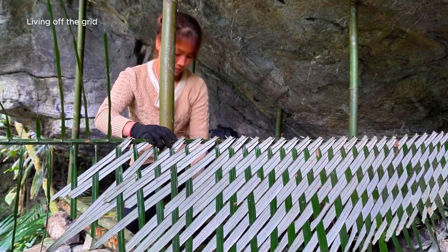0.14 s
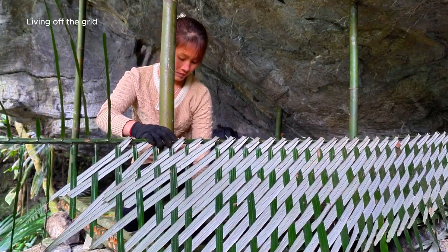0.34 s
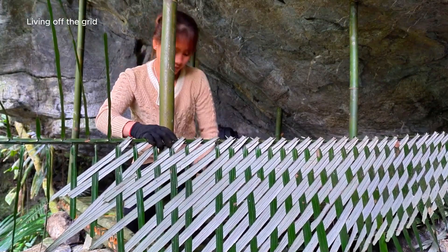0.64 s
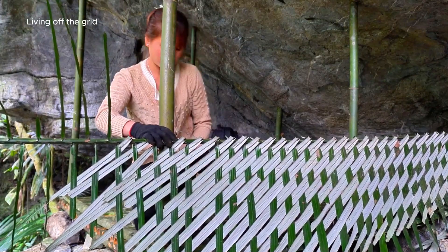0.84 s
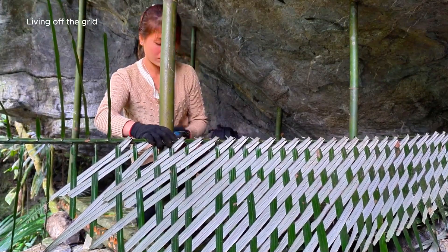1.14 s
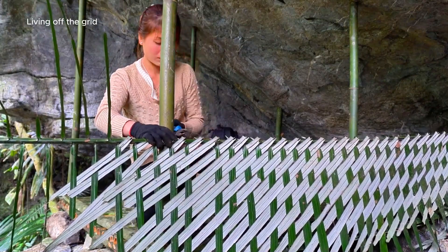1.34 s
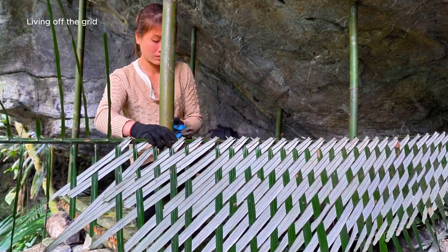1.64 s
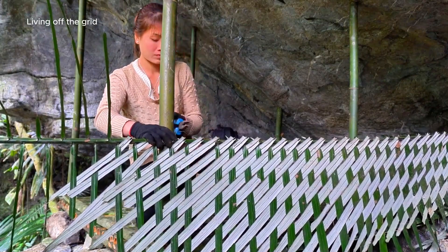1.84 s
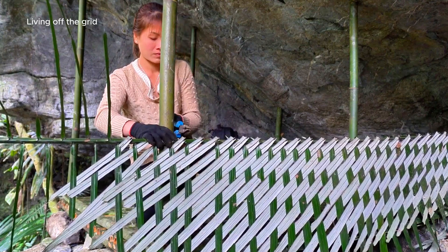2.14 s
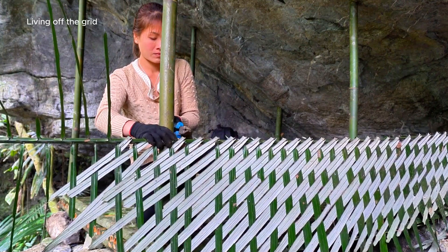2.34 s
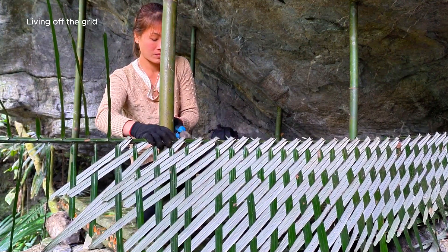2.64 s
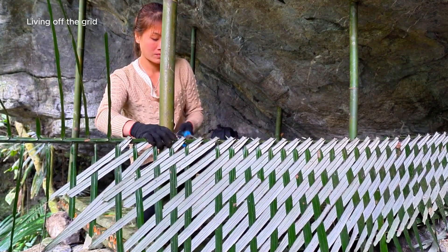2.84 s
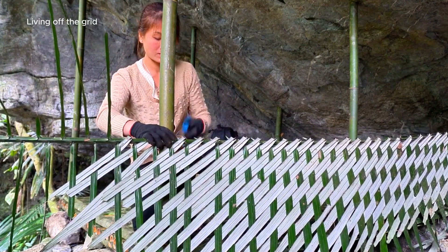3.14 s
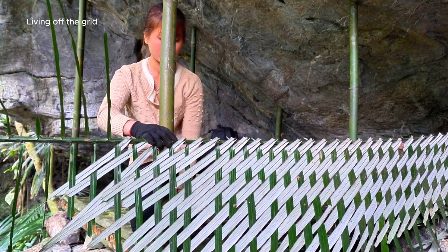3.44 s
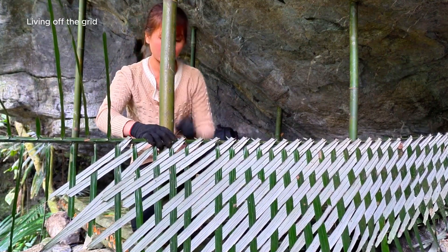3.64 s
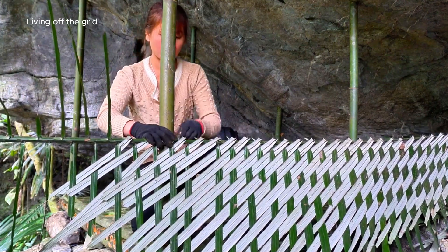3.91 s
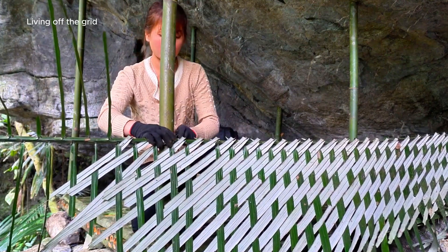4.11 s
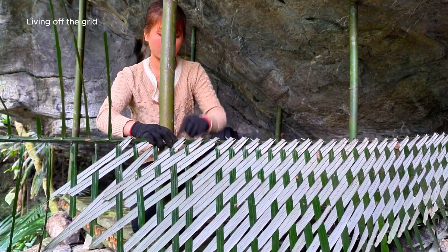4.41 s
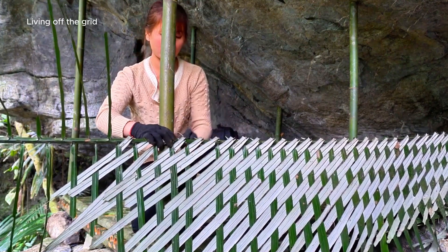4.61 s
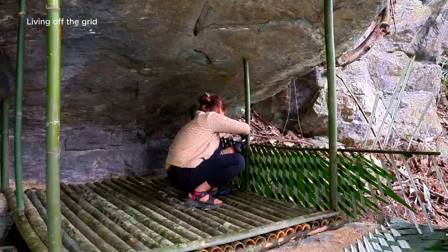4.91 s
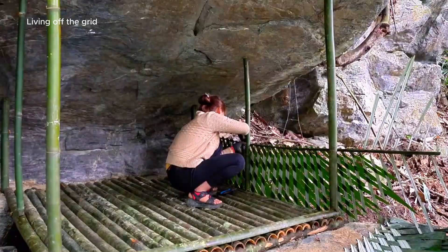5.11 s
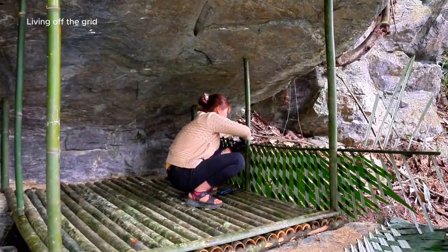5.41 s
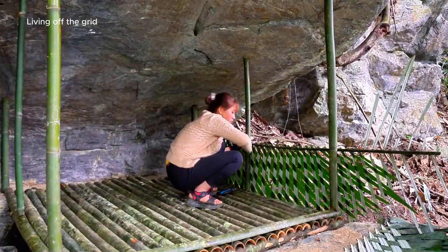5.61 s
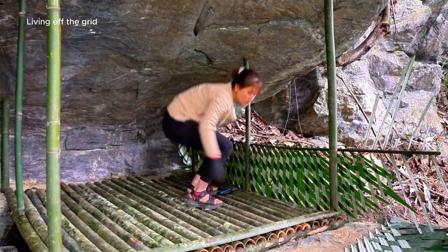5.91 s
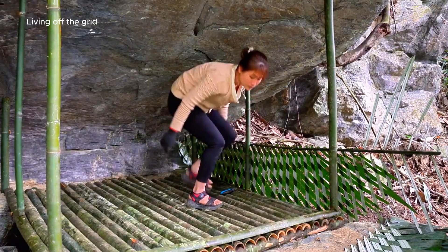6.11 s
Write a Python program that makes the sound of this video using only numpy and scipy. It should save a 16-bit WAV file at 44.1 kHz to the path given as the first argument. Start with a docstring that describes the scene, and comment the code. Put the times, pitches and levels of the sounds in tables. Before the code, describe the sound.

Hands weave split bamboo strips into a bamboo lattice under a rock overhang. A sharp snap and rattle come within the first half second, then mostly quiet. Around two seconds a small scrape, then a hard bright click, and from three and a half a busy run of woody slides and taps. It thins out, ending with one firm scrape and knock. Close stereo microphone, faint hiss and short sparse echoes.

```python
"""Bamboo weaving under a rock overhang

Hands weave thin bamboo strips through a bamboo frame. Ticks, a short ring and a bright snap, are strip edges
letting go. Slaps and slides are bursts of tiny slips that ring the mat, the moving strip and the frame, with
fibre hiss on top. The rock answers with a short tail of sparse echoes; behind it all lies quiet forest air
with microphone hiss, drawn as random spectra."""
import sys
import numpy as np
from scipy import signal
from scipy.io import wavfile
from scipy.ndimage import uniform_filter1d

SR = 44100
rng = np.random.default_rng(int(sys.argv[2]) if len(sys.argv) > 2 else 0)


def store_wav(level_fs):
    """Save 16-bit WAV to argv[1]."""
    pcm = np.round(np.clip(np.atleast_2d(level_fs), -1, 1) * 32767)
    wavfile.write(sys.argv[1], SR, pcm.T.astype(np.int16))


N = 276066  # samples

# spectrum of fibres rubbing and snapping: hz [Hz], level_db [relative dB per Hz]
FIBRE_HISS = [(2900, -33.5), (5000, 1), (6200, -0.5), (7200, -3.5), (8500, -2), (10200, 0.5), (12000, -2.5),
              (15500, -5), (16500, -2.5)]
LEAN_DB = -0.15  # left over right, for slaps and slides


def snapping_ticks():
    """Strip edges bend past each other and let go, each one a sharp release."""
    # releases: start_s [s], peak_db [dB], ring_hz [Hz], treble_db [dB against the ring], pan_db [dB left over right]
    releases = [(0.0274, -17.5, 5200, -19, 1), (0.0613, -20, 2620, -7, -1), (0.1693, -41.5, 2440, 7, -2),
                (0.386, -36.5, 1900, 10.5, 12), (0.4586, -11, 4060, 3.5, -3), (1.817, -29.5, 6040, 9, 0),
                (2.572, -30, 7480, 32, -2.0), (2.6574, -7.5, 1790, 19, -2), (2.661, -8.5, 5100, 3.5, 2.0),
                (3.1797, -20.5, 3800, 8.5, 0), (3.1986, -25.5, 5130, 3.5, 1.0), (3.572, -51, 1480, -20, -2),
                (3.7974, -40.0, 6940, -4.5, 3.0), (3.8636, -35, 1630, 4.5, -1.0), (4.086, -23, 3540, 5, 0),
                (4.2125, -34, 4520, -6, 3), (4.794, -37, 5780, 10, -1.0), (4.9116, -30.5, 4500, -11, 2),
                (5.279, -45, 5070, 4, 0), (6.1402, -18, 1820, 4, -8), (6.145, -24, 1550, -8, 0)]
    ticks = np.zeros((2, N))
    for start_s, peak_db, ring_hz, treble_db, pan_db in releases:
        add(ticks, start_s, tick(peak_db, ring_hz, treble_db), pan_db)
    return ticks


def tick(peak_db, ring_hz, treble_db):
    """One sharp release: a ring of a few cycles and a bright snap."""
    ring = thin(ringing([(ring_hz, 0.17 * ring_hz, 0)]), 1320.0)[:512]
    snap = coloured(FIBRE_HISS)
    both = ring / abs(ring).max() + gain_of(treble_db) * snap / abs(snap).max()
    return gain_of(peak_db) * both[None] / abs(both).max()


def slapping_strips():
    """A strip slaps its neighbours: scrapes with a quick rise and a very short hold."""
    # slaps: start_s [s], strip_db [dB], ring_hz [Hz],
    # ring_db, frame_db, hiss_db [dB against the strips], t60_ms [ms, before each part's own decay factor]
    slaps = [(0.0273, -35.5, 4140, -6.5, -22, 1.5, 79), (0.054, -37.5, 2600, -9, -15, 1, 165),
             (0.168, -57, 1790, -14, -5.5, -2.5, 140), (0.227, -58.5, 2540, -13, -19, 1.5, 129),
             (0.375, -63, 1830, 1, 13.5, -6, 160), (0.458, -30.5, 2620, -13, -14, 1, 130),
             (0.5, -49.5, 3870, -3, 5, 1.5, 199), (1.638, -62.5, 2120, -6, -15, 4, 97),
             (1.815, -51.5, 1620, -6, -8.5, 1, 170), (1.999, -52.5, 5120, -4, -18, -2.5, 320),
             (2.092, -50.5, 1244, -4.5, -27, -4, 230), (2.657, -34, 1700, -24, -16, 4, 50),
             (2.886, -48, 2760, -12, -16, -15, 300), (3.176, -43, 5100, -10, -26, 7.5, 61),
             (3.194, -50.5, 5090, -15, -25, 3, 92), (3.864, -47.5, 3020, -10, -4, -5, 55),
             (4.005, -39.5, 2840, -22, -17.5, -1, 129.6), (4.21, -40, 4530, -18, -20, -6.5, 171),
             (4.522, -59.5, 2510, -1.5, -5, 2, 160), (4.791, -58, 1590, -3, -6.5, 3.5, 100),
             (5.274, -63.5, 5460, -12, -3, 5.5, 70.2)]
    rise_ms, hold_ms = 2.35, 3.1
    scrapes = np.zeros((2, N))
    for *contact, t60_ms in slaps:
        add(scrapes, contact[0], stroke(*contact, rise_ms, hold_ms, t60_ms), LEAN_DB)
    return scrapes


def sliding_strips():
    """A strip is dragged through the weave: scrapes with their own rise and hold."""
    # slides: start_s [s], strip_db [dB], ring_hz [Hz],
    # ring_db, frame_db, hiss_db [dB against the strips], rise_ms [ms], hold_ms [ms]
    slides = [(0.0, -54, 1240, -4, -7.5, 0.5, 0.55, 64), (0.06, -53, 1315, 3, -7, -12, 3.2, 23),
              (0.25, -67.5, 2450, -7, -9, -1, 10, 95), (0.335, -63, 1440, -2, 5, -10, 10, 21),
              (0.386, -62.5, 2350, 0, -0.5, 6.5, 1.6, 46), (0.435, -40, 3760, -23, -4, -2, 14, 27),
              (0.465, -34, 2600, -5, -2, -2, 11, 15), (0.86, -68.5, 1420, -9, -17, -16, 41, 140),
              (1.555, -61, 1830, -8, -21, -3, 8, 16), (1.74, -64.5, 1130, -5, -15, -18, 11, 80),
              (1.85, -62.5, 2690, -24, -16, -0.5, 19, 107), (2.041, -38.5, 1426, -1, -17, 2.5, 8.5, 4),
              (2.065, -53, 1213, -3, -11, -6, 4, 21), (2.67, -47, 1850, -8, -17, 2.5, 3.4, 36),
              (2.709, -48, 5500, -9, -14, -2.5, 12, 52.4), (2.799, -59.5, 1800, -12, -17, -2, 23, 89),
              (2.93, -58.5, 1330, -2, -14, -19, 3.6, 20), (3.482, -38, 3060, -5.5, -12, -3.5, 8.9, 6.3),
              (3.497, -27.5, 3120, -7, -4.5, -30, 13, 13), (3.535, -43.5, 3150, -16, 7.5, -25, 7.5, 4),
              (3.569, -27, 1465, -9.5, -6, -37, 0.5, 18), (3.587, -38.5, 3760, -18, -4, -6.5, 3.5, 26),
              (3.64, -56.5, 1910, -22, -4, -5.5, 7.1, 55), (3.76, -65, 1247, -3, -1.5, -0.5, 7.8, 46),
              (3.874, -33, 2820, -6.5, -18.5, 2, 19.4, 18), (3.92, -44, 3020, -19, -17, -4, 3.8, 39.6),
              (4.031, -49, 3030, -22, -15, -6.5, 18, 25), (4.073, -40.5, 2830, -19, -20, -3, 6, 4),
              (4.085, -34, 3040, -20, -19, 1, 1.1, 17.5), (4.108, -39.5, 4320, -7.5, -11.5, -2.5, 5.8, 26),
              (4.15, -47.5, 2000, -13, -17, -4.5, 8.2, 37.4), (4.24, -52.5, 1320, -13, -16.5, -21, 6.1, 67),
              (4.57, -68.5, 4290, -16, -3, 2, 6.2, 45), (4.84, -52, 3000, -25, -14, -7, 46, 19),
              (4.897, -43.5, 4530, -15, -13, -3, 14.4, 9.4), (5.12, -81.5, 1980, -12, -11, 12.5, 18, 95),
              (6.102, -30.5, 2120, -8, -10, -3, 27.8, 8.9), (6.128, -26.5, 1880, -10, -9, -8.5, 9.4, 4),
              (6.185, -55, 1810, -16, -17, -10, 9.2, 38)]
    t60_ms = 103.4  # before each part's own decay factor
    scrapes = np.zeros((2, N))
    for row in slides:
        add(scrapes, row[0], stroke(*row, t60_ms), LEAN_DB)
    return scrapes


def stroke(start_s, strip_db, ring_hz, ring_db, frame_db, hiss_db, *shape_ms):
    """The balance of frame and hiss, the strip's length and the place of the hands set where mat and frame ring."""
    # where the hands work picks the frame's favoured ring: time_s [s], frame_hz [Hz, before the shift by frame_db]
    hand_places = [(0, 576), (.4, 450), (.5, 600), (2.5, 525), (3.5, 690), (3.62, 500), (3.85, 700),
                   (4.3, 750), (5.2, 450), (6.1, 850)]
    centre_hz = 3160
    # a shorter, higher strip pulls the mat's ring up with it, by this share
    follows_ring = 0.23
    # a hissier stroke excites the mat higher up, 0.08 octave per dB
    hiss_octaves = 0.08 * max(hiss_db, -6.5)
    mat_hz = centre_hz * (ring_hz / centre_hz) ** follows_ring * 2 ** hiss_octaves
    # a stroke that shakes the frame harder reaches its lower modes, 0.015 octave per dB
    frame_hz = np.interp(start_s, *np.transpose(hand_places)) * 2 ** (-0.015 * frame_db)
    return scrape(strip_db, mat_hz, ring_hz, ring_db, strip_db + frame_db, frame_hz, strip_db + hiss_db, *shape_ms)


def scrape(strip_db, mat_hz, ring_hz, ring_db, frame_db, frame_hz, hiss_db, rise_ms, hold_ms, t60_ms):
    """Slips under one stroke excite the mat, the moving strip, the frame and the fibres."""
    # modes of the woven strips: mode_hz [Hz], width_hz [Hz], level_db [dB, before leaning]
    strip_modes = [(1474, 14, -2.5), (1890, 500, 5.5), (2347, 17, -5.5), (2760, 340, -2), (3242, 28, -5),
                   (3732, 870, 3), (4480, 26, -43), (5570, 13, -7.5), (5760, 53, -3.5)]
    # modes of poles and mat: mode_hz [Hz], width_hz [Hz], level_db [dB, before leaning]
    frame_modes = [(159, 32, -2.5), (260.5, 15, -2), (470, 47, 1.5), (318, 33, -11), (578, 36, 1.5),
                   (742.5, 42, 6), (871, 39, -1.5), (989, 39, -7)]
    # overtones of the moving strip: multiple [of its ring], level_db [dB]
    overtones = [(1, 5), (2.35, -9.5), (3.62, -10.5)]

    ms = np.arange(SR // 3) / SR * 1000
    rise = np.minimum(ms / (rise_ms + 0.27), 1) ** 1.6
    after_ms = np.maximum(ms - rise_ms - hold_ms, 0)

    mat = thin(ringing(leaning(strip_modes, mat_hz, 10.2) + [(mat_hz, 0.5 * mat_hz, 6)]), 1210.0)
    # the free length of the moving strip sets one clear ring of its own
    own_modes = [(multiple * ring_hz, 0.032 * ring_hz, db) for multiple, db in overtones]
    strip = mat + gain_of(ring_db) * thin(ringing(own_modes), 880.0)
    frame = thin(ringing(leaning(frame_modes, frame_hz, 4.3)), 0.21 * frame_hz)

    # the finest fibres are damped soonest, so the hiss darkens as it dies
    hiss = coloured(FIBRE_HISS)
    fizz = thin(hiss, 5700.0)

    # (drive dB, body, left-right likeness, decay factor): fibres go quiet first, heavy poles last
    parts = ((strip_db, strip, 0.4, 1.01),
             (frame_db, frame, 0.75, 1.2),
             (hiss_db, hiss - 0.32 * fizz, 0.25, 0.9),
             (hiss_db, 0.17 * fizz, 0.25, 0.65))
    size = catches(len(ms), 450.0, 3.9, 0.26)
    out = 0
    for db, body, same, slower in parts:
        envelope = rise * gain_of(db - 60 * after_ms / (slower * t60_ms + 1))
        drive = envelope * slips(size, same)
        out = out + signal.fftconvolve(drive, body[None], axes=1)[:, :len(ms)]
    return out


def catches(count, per_s, spread_db, share):
    """Sizes of the slips: an even rub plus uneven catches on the nodes, each a short jolt."""
    caught = rng.random(count) < per_s / SR
    jolts = caught * gain_of(spread_db * np.minimum(rng.exponential(1, count), 3))
    return 1 + share * evened(signal.lfilter([1], [1, -0.96], jolts))


def slips(size, same):
    """Tiny slips of the given sizes; the two ears share only part of them."""
    a, b = rng.standard_normal((2, len(size)))
    return evened(size * np.array([a, same * a + np.sqrt(1 - same ** 2) * b]))


def leaning(modes, hz, slope_db):
    """Modes near hz are favoured, by slope_db per octave: the place of contact picks them."""
    return [(f, width, db - slope_db * abs(np.log2(f / hz))) for f, width, db in modes]


def ringing(modes):
    """Impulse response of damped modes (Hz, width Hz, dB), energy 1: wider modes die sooner."""
    t = np.arange(2048) / SR
    out = 0
    for hz, width, db in modes:
        decay = np.exp(-np.pi * width * t)
        out = out + gain_of(db) * np.sqrt(width) * decay * np.sin(2 * np.pi * hz * t)
    return out / np.linalg.norm(out)


def thin(x, hz):
    """A small body cannot push low notes into the air: a high-pass at hz."""
    return signal.sosfilt(signal.butter(4, hz, "high", fs=SR, output="sos"), x)


def coloured(points):
    """Causal impulse response with the given spectrum, energy 1."""
    log_level = np.log(gain_of(read(points, abs(np.fft.fftfreq(1024, 1 / SR)))))
    # the Hilbert transform of the log level gives the minimum phase
    spectrum = np.exp(np.conj(signal.hilbert(log_level)))
    out = np.fft.ifft(spectrum).real[:512]
    return out / np.linalg.norm(out)


def rock(x):
    """Sparse taps of random sign, each band dying at its own speed, other taps for each ear."""
    # tail of the overhang: hz [Hz], t60_s [s]
    rock_decay = [(200, 0.35), (1500, 0.1), (5000, 0.22), (14000, 0.068)]
    taps = np.zeros((2, SR // 2))
    # one tap at a random place in every 20 samples
    at = np.arange(60, SR // 2 - 20, 20) + rng.integers(0, 20, (2, (SR // 2 - 61) // 20))
    np.put_along_axis(taps, at, rng.choice([-1., 1.], at.shape), 1)
    hz, t, z = signal.stft(taps, SR, nperseg=128)
    fade = gain_of(-60 * t / read(rock_decay, hz)[:, None])
    tail = signal.istft(z * fade, SR, nperseg=128)[1]
    return signal.fftconvolve(x, tail / np.linalg.norm(tail[0]), axes=1)[:, :N]


def air():
    """Forest air and microphone hiss: random short-time spectra with faint drifting patches."""
    # spectrum of the air: hz [Hz], level_db [relative dB per Hz]
    air_spectrum = [(18, -38), (30, -20), (103, -0.5), (141, -6.5), (364, -4), (415, -1), (584, -5),
                    (702, -3), (889, -4), (2980, -11.5), (4190, -14), (14800, -19.5), (16000, -23.5)]
    # slow swell: time_s [s], low_db [relative dB under about 2.4 kHz], high_db [relative dB above]
    air_swell = [(0.0, -1, 0.5), (6.26, -1.5, 2)]
    # likeness of the two ears: hz [Hz], same [-1 to 1]
    air_likeness = [(60, 1), (240, -0.00026), (950, -0.051), (3770, -0.043), (15000, 0.036)]

    frames, hz = N // 256 + 5, np.fft.rfftfreq(1024, 1 / SR)
    a, b, c, d, patches = rng.standard_normal((frames, 513, 5)).T
    patches = evened(uniform_filter1d(uniform_filter1d(patches, 12, 0), 14, 1))

    time_s, low_db, high_db = np.transpose(air_swell)
    t = np.arange(frames) * 256 / SR
    high = (hz ** 2 / (hz ** 2 + 2400.0 ** 2))[:, None]
    swell_db = (1 - high) * np.interp(t, time_s, low_db) + high * np.interp(t, time_s, high_db)

    same = np.clip(read(air_likeness, hz), -1, 1)[:, None]
    left = a + 1j * b
    right = same * left + np.sqrt(1 - same ** 2) * (c + 1j * d)
    level_db = read(air_spectrum, hz)[:, None] + 1.7 * patches + swell_db
    z = np.array([left, right]) * gain_of(level_db)
    out = signal.istft(z, nperseg=1024, noverlap=768)[1][:, :N]
    return gain_of(-62.0) * evened(out)  # rms dB


def gain_of(db):
    """dB to gain."""
    return 10 ** (np.asarray(db) / 20)


def evened(x):
    """Scales to rms 1."""
    return x / np.sqrt(np.mean(x ** 2) + 1e-20)


def read(points, hz):
    """Reads a (Hz, value) curve on a log-frequency axis."""
    f, value = np.transpose(points)
    return np.interp(np.log(hz + 1), np.log(f + 1), value)


def add(mix, start_s, sound, pan_db):
    """Places a sound at start_s by level between the ears; positive pan_db leans left."""
    part = mix[:, round(start_s * SR):][:, :sound.shape[-1]]
    panned = gain_of([[pan_db / 2], [-pan_db / 2]]) * sound
    part += panned[:, :part.shape[1]]


def scene():
    """Ticks, slaps and slides, their tail off the rock, and the air."""
    ticks = snapping_ticks()
    scrapes = slapping_strips() + sliding_strips()
    to_rock = gain_of(-4) * ticks + gain_of(-13.5) * scrapes
    return ticks + scrapes + rock(to_rock) + air()


def record(dry):
    """The band limit: a linear-phase low-pass."""
    edge_hz = 16100
    low_pass = signal.firwin(511, edge_hz, window=("kaiser", 9), fs=SR)
    return signal.oaconvolve(dry, low_pass[None], "same")


dry = scene()
out = record(dry)
store_wav(out)
```